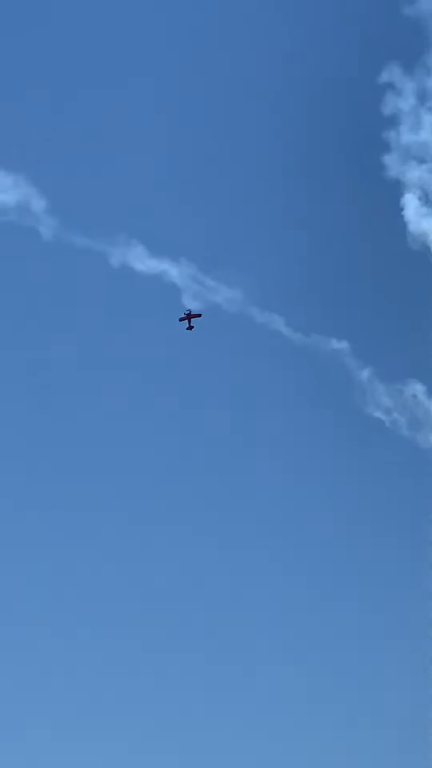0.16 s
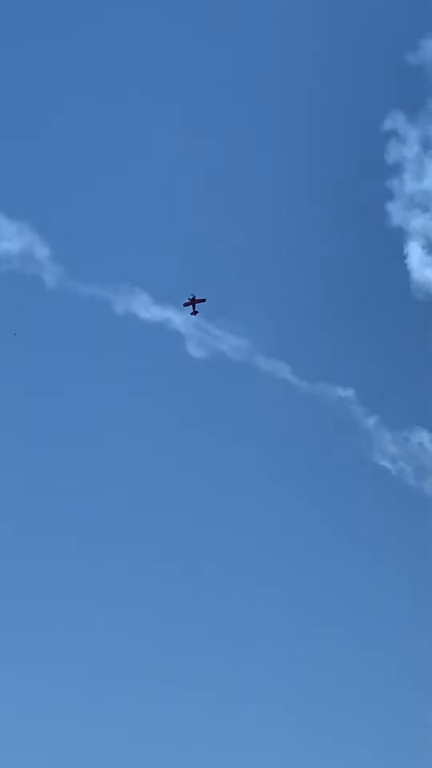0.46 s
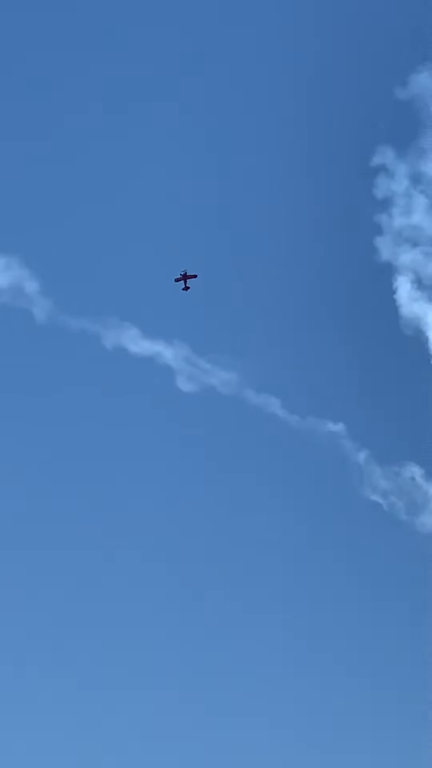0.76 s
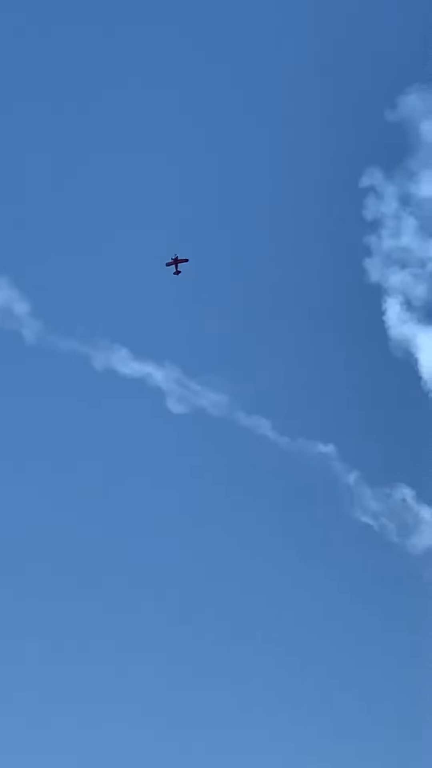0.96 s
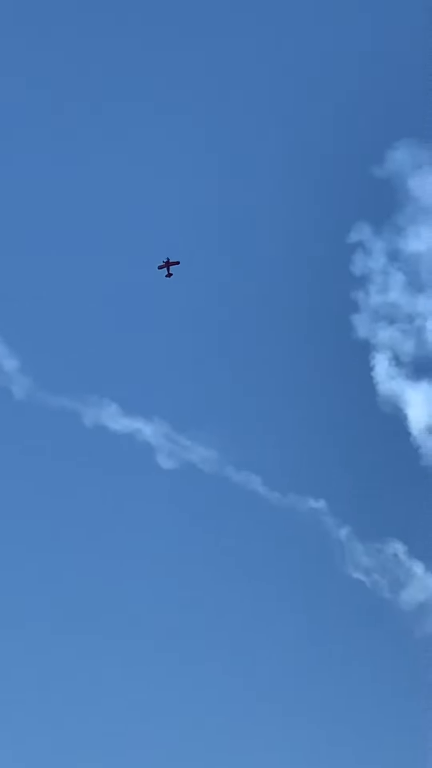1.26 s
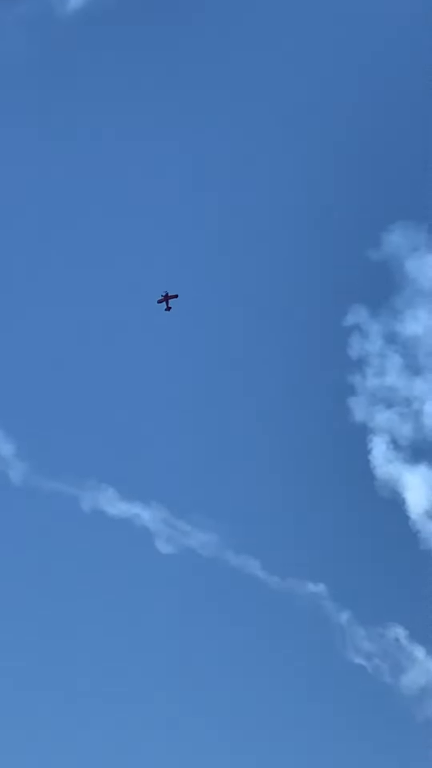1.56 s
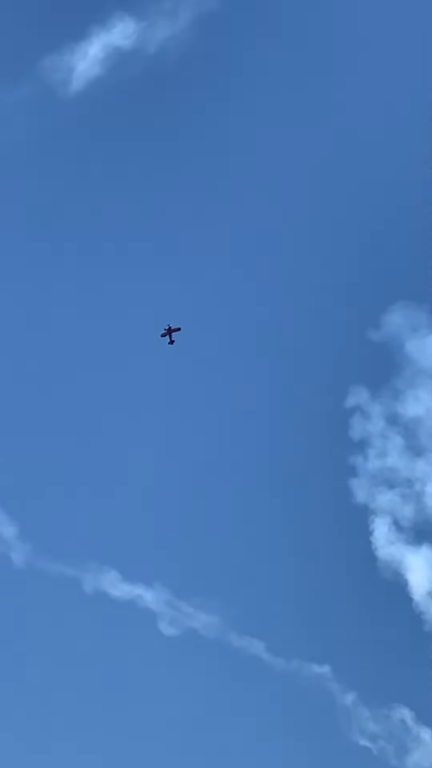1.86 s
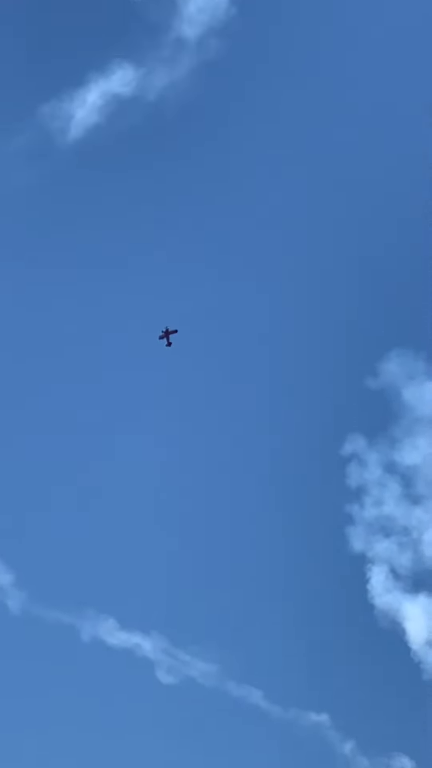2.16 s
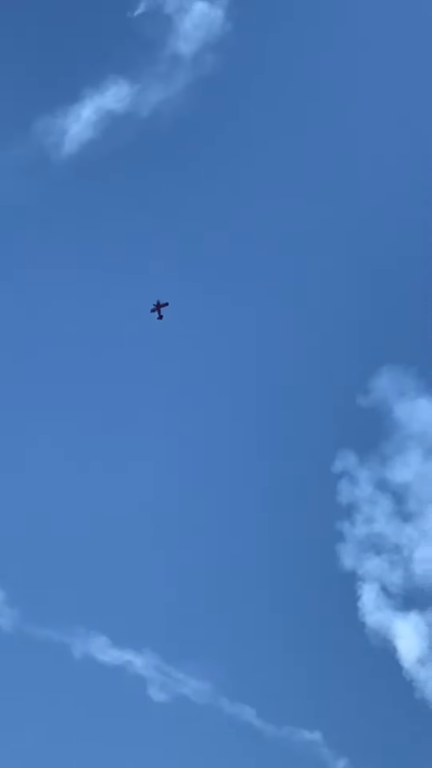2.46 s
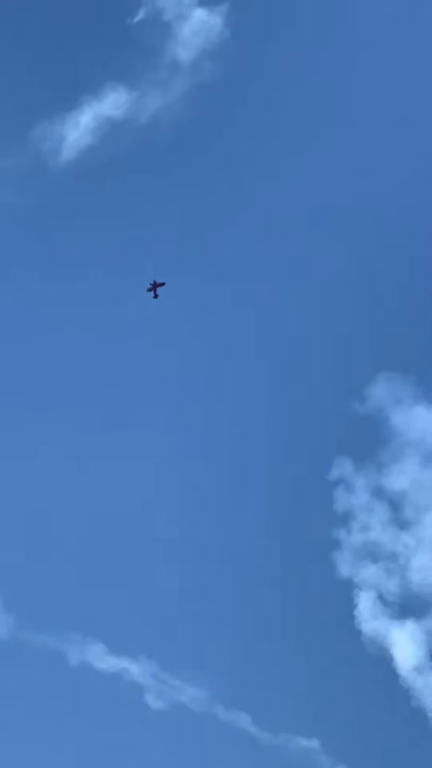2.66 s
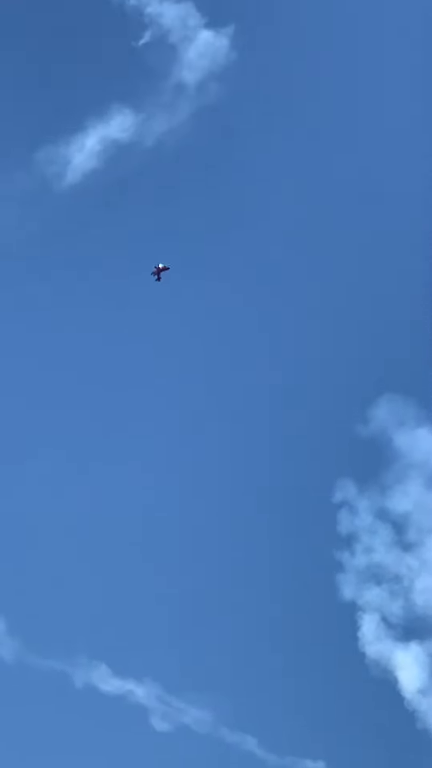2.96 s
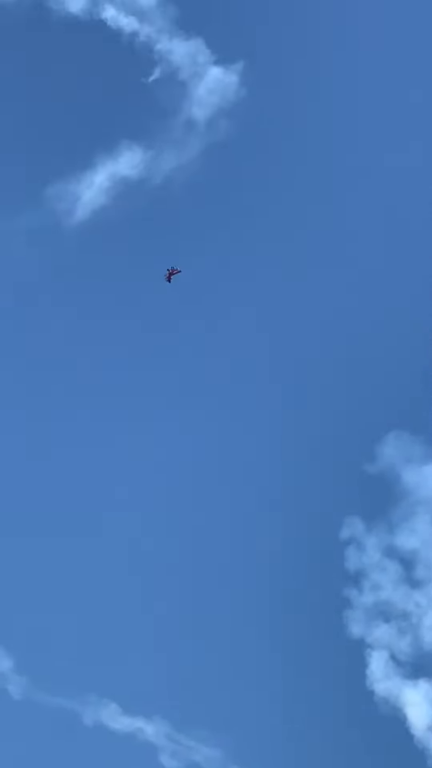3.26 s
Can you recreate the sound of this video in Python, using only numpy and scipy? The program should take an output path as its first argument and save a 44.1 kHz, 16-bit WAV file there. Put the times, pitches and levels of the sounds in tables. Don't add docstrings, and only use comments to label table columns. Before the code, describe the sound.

A small propeller plane's piston engine swells from a faint airy drone at 0 s to a hard, raspy blade buzz peaking around 1.0-1.4 s, its pitch sliding steadily down. From 1.5 s the treble dulls and flutters; around 2 s the tone roughens, then thins to a low, wavering hum by 3.4 s. Diffuse open-field rumble, faint hollow returns after 2.3 s, soft low wind thumps and very faint phone hiss.

```python
import sys
import numpy as np
from scipy import signal
from scipy.fft import rfft, irfft, next_fast_len
from scipy.io import wavfile
from scipy.ndimage import uniform_filter1d, minimum_filter1d, map_coordinates

SR = 44100
rng = np.random.default_rng(int(sys.argv[2]) if len(sys.argv) > 2 else 0)


def transcribe(u):
    v = np.clip(np.atleast_2d(u).T, -1, 1)
    q = np.round(v * 32767).astype(np.int16)
    wavfile.write(sys.argv[1], SR, q)


def magnitude_from_level(level_db):
    exponent = np.asarray(level_db, float) / 20
    return 10 ** exponent


N = 149940
TIME = np.arange(N) / SR


def unit(x):
    return x / np.sqrt(np.mean(x ** 2) + 1e-20)


def along(points, hz):
    f, v = np.transpose(points)
    return np.interp(np.log(hz + 1), np.log(f + 1), v)


def curves(rows):
    start_s, *columns = np.transpose(rows)
    return [np.interp(TIME, start_s, column) for column in columns]


def bumps(rows):
    return sum(height * np.exp(-((TIME - start_s) / width_s) ** 2) for start_s, height, width_s in rows)


def wobble(rate):
    return map_coordinates(rng.standard_normal(400), [TIME * rate])


def filtered(x, response):
    m = next_fast_len(N + SR // 4)
    m += m % 2
    return irfft(rfft(x, m) * response(np.fft.rfftfreq(m, 1 / SR)), m)[..., :N]


def causal(spectrum, ring=1):
    def response(hz):
        cepstrum = irfft(np.log(magnitude_from_level(along(spectrum, hz))))
        cepstrum[1:len(hz) - 1] *= 1 + ring
        cepstrum[len(hz):] *= 1 - ring
        return np.exp(rfft(cepstrum))
    return response


# pitch_hz, correlation [0 to 1]
PORT_LIKENESS = [(60, .92), (500, .8), (2000, .4), (5000, .2)]


def pair(spectrum):
    def shared_and_split(hz):
        turn = np.arccos(np.clip(along(PORT_LIKENESS, hz), -1, 1)) / 2
        return magnitude_from_level(along(spectrum, hz)) * np.array([np.cos(turn), np.sin(turn)])
    shared, split = filtered(rng.standard_normal((2, N)), shared_and_split)
    return unit(np.array([shared + split, shared - split]))


# start_s, pitch_hz
BLADE_RATE = [(0, 172.6), (.42, 164.5), (.63, 160.4), (1.05, 150.7), (1.47, 142.2), (1.68, 138.5),
              (1.89, 136.6), (2.1, 134), (2.31, 132), (2.94, 131.2), (3.4, 129)]
# start_s, snap_db, pop_db (over snap), rush_db (over snap), air_loss_db_per_khz
PASS_LEVELS = [(0.0, -54, -10, -1.5, 4), (.27, -33, -10.5, -5.5, 6), (.42, -28, -8.5, -5, 4),
               (0.5, -23.5, -13, -7.5, 3), (0.6, -28.5, -4, -4.5, 3), (0.76, -23.5, -2.5, -8.5, 2.5),
               (0.79, -27.5, -5.5, -6, 1.5), (1.0, -16.5, -7, -12.5, 2), (1.12, -17.5, -12, -11, 2),
               (1.22, -13, -14.5, -8.5, 2.5), (1.36, -17.5, -8.5, -15, 4.5), (1.43, -18, -9.5, -17, 9.5),
               (1.53, -34.5, -15, -22.5, 7.5), (1.6, -23, -16.5, -8, 8.5),
               (1.67, -35.5, -11.5, -16.5, 12.5), (1.83, -29, -14, -9.5, 12.5), (1.86, -42, -10.5, 1.5, 4),
               (2.03, -35.5, -7.5, 2, 7), (2.15, -36.5, -8, -6.5, 4), (2.24, -45, -7, -6.5, -0.5),
               (2.72, -43, -6.5, 0, -6), (2.84, -53, -4, -13, 5), (3.37, -47.5, -1.5, -12.5, -2),
               (3.4, -55, -8, -12, -3)]
# start_s, treble_gain_db_per_khz, width_s
CLEAR_AIR = [
    (0.464, 1, .05),
    (1.178, 2.5, 0.022),
    (1.4, 1.9, 0.016),
    (1, 0.66, .04),
    (1.3, 1, 0.033),
    (1.4, 1.5, .03),
    (2.71, 1.6, 0.03),
    (3.28, -0.1, .05),
    (1.8, 1, 0.032),
    (.88, .5, 0.032),
]


def plane():
    cycles = np.cumsum(curves(BLADE_RATE)[0]) / SR
    snap_db, pop_db, rush_db, loss = curves(PASS_LEVELS)
    flare = bumps(CLEAR_AIR)
    bright = tip_snaps(cycles) + magnitude_from_level(pop_db) * exhaust_pops(cycles) + magnitude_from_level(rush_db) * air_rush(cycles)
    bright = magnitude_from_level(snap_db + flare) * bright
    return engine_tones(cycles) + air(bright, np.maximum(loss, 0.87 * TIME) - flare, shimmer_db=2.6)


# start_s, pitch_hz (unused), thrum_db, drone_db, pipe_db, uneven_db
TONE_LEVELS = [(0.0, 172.9, -39.5, -41.5, -43.5, -53.5), (0.21, 169.7, -28, -39, -43.5, -45),
               (0.34, 166, -28, -29, -39, -46), (0.49, 162.9, -31.5, -22.5, -46, -46),
               (0.61, 161.5, -19.5, -27.5, -52, -49.5), (0.69, 161.3, -20.5, -43.5, -38, -48.5),
               (0.72, 158.3, -19, -30.5, -32.5, -57), (0.9, 154.2, -16.5, -31, -25, -45),
               (1.0, 151.9, -16.5, -35.5, -31, -44), (1.21, 147.4, -18, -18, -27, -31),
               (1.4, 143.6, -21.5, -21.5, -31, -39.5), (1.51, 143.2, -20, -19.5, -47, -40),
               (1.61, 139.6, -22.5, -20.5, -26, -36), (1.86, 138.7, -27, -23, -48, -39),
               (1.93, 136.9, -32, -39, -32, -42), (2.01, 135.5, -34.5, -33, -30, -39.5),
               (2.15, 134, -35.5, -30, -30, -38), (2.26, 133, -34.5, -36, -33.5, -44.5),
               (2.4, 133.1, -31, -27.5, -34.5, -40), (2.62, 132, -36.5, -30, -38, -37.5),
               (2.7, 132, -48, -28.5, -42.5, -41.5), (2.96, 132.5, -51, -27.5, -44, -44.5),
               (3.4, 130.6, -48, -32.5, -42.5, -43.5)]
# multiple of blade rate, level_db, drift_db_per_s as the tail turns to us
SHAFT_LINES = [(1 / 3, -17.5, .1), (2 / 3, -7, 0.53), (4 / 3, 2.7, -5.5), (5 / 3, -13, .1),
               (7 / 3, -4, 5.1), (8 / 3, -12.5, 5.2), (10 / 3, -1.7, -4.8), (11 / 3, -24.5, .1),
               (13 / 3, -9.5, 0.47), (16 / 3, -9, 2)]


def engine_tones(cycles):
    _, *levels, uneven_db = curves(TONE_LEVELS)
    rough = ragged(TIME) - 1.5 * (TIME > WAKE_S)
    tones = np.zeros(N)
    for k, db in enumerate(levels):
        level = np.sqrt(2) * magnitude_from_level(db + .45 * rough * wobble(35))
        drift = k * k * (TIME - 1.1) + .07 * k * rough * wobble(40)
        tones += level * np.cos(2 * np.pi * (k + 1) * cycles + drift)
    for order, db, drift_db in SHAFT_LINES:
        turning_db = drift_db * (np.minimum(TIME, 2.6) - 1.1)
        level = magnitude_from_level(uneven_db + db + turning_db + 2.8 * wobble(4.98))
        waver = .13 * order * (1 + .3 * rough) * wobble(14)
        tones += level * np.cos(2 * np.pi * order * cycles + waver)
    return tones


def pulses(cycles, pattern_db):
    jitter_cycles, scatter_db = .0015, .45
    k = np.arange(1, int(cycles[-1]))
    luck = rng.standard_normal((len(k), 2))
    at = np.interp(k + jitter_cycles * luck[:, 0], cycles, np.arange(N))
    taps = np.floor(at)[:, None] + np.arange(-7, 9)
    offset = taps - at[:, None]
    shape = np.sinc(offset) * np.cos(np.pi * offset / 18) ** 2
    size = magnitude_from_level(np.asarray(pattern_db)[k % len(pattern_db)] + scatter_db * luck[:, 1])
    where = np.clip(taps, 0, N - 1).astype(int)
    return np.bincount(where.ravel(), (shape * size[:, None]).ravel(), N)


# pitch_hz, level_db
SNAP_COLOUR = [(350, -43.5), (520, 6.5), (700, 7.5), (1100, -1), (2000, -4), (3500, -19.5), (6500, -30),
               (9000, -27)]


def tip_snaps(cycles):
    def before_and_after(hz):
        return np.array([causal(SNAP_COLOUR, ring)(hz) for ring in (.35, .75)])
    turned = np.interp(TIME, (1.08, 1.3), [0, 1])
    early, late = filtered(pulses(cycles, [0]), before_and_after)
    return unit((1 - turned) * early + turned * late)


# start_s, lag_cycles
POP_DELAY = [(0, 0.56), (.15, 0.6), (.42, 0.43), (.6, 0.5), (1.4, .98), (1.8, 0.72), (3.4, 1.55)]
CYLINDERS = [.1, -2, 1.1, -.8, 1.5, -1.7]
# pitch_hz, level_db
POP_COLOUR = [(350, -34), (520, 2), (700, -3.7), (1500, -4), (2200, -9), (3500, -18.5), (9000, -28.5)]


def exhaust_pops(cycles):
    firing = pulses(cycles - curves(POP_DELAY)[0], CYLINDERS)
    return unit(filtered(firing, causal(POP_COLOUR)))


# pitch_hz, level_db
RUSH_COLOUR = [(150, -16), (450, -4.5), (800, -1.5), (1800, 0.5), (3500, -9), (6500, -25), (9000, -40)]


def air_rush(cycles):
    return pair(RUSH_COLOUR) * (1 + .3 * np.cos(2 * np.pi * cycles - .6))


WAKE_S, WAKE_WIDE_S = 2.07, .2


def ragged(t):
    return 1 + 5 * np.exp(-((t - WAKE_S) / WAKE_WIDE_S) ** 2) + 2 * (t > WAKE_S)


def air(x, loss, shimmer_db):
    hz, t, z = signal.stft(x, SR, nperseg=512)
    patches = uniform_filter1d(rng.standard_normal((3, *z.shape[1:])), size=4, axis=1)
    slow = uniform_filter1d(patches[:2], size=13, axis=2)
    focus, skew = unit(uniform_filter1d(slow, size=7, axis=2))
    smear = .14 * ragged(t) * unit(uniform_filter1d(patches[2], size=6, axis=1))
    depth = np.clip(hz / 1500, .4, 1.5)[:, None]
    loss_db = np.outer(hz - 1000, np.interp(t, TIME, loss)) / 1000
    gain = magnitude_from_level(shimmer_db * depth * focus - loss_db)
    apart = .5 * .3 * np.array([skew, -skew])
    turn = np.exp(1j * depth * (smear + apart))
    return signal.istft(z * gain * turn, SR, nperseg=512)[1][:, :N]


# pitch_hz, level_db
FIELD_COLOUR = [(60, -8.5), (330, -2.5), (480, -12.5), (700, -3), (1050, -12), (1450, -7.5), (2800, -19.5),
                (6500, -54)]
# start_s, level_db
FIELD_SWELL = [(0, -7), (.4, 0.5), (1.3, 10), (2.4, 0.5), (3.4, 0)]
# start_s, level_db, width_s
WALL_RETURNS = [
    (2.361, 4.5, 0.048),
    (2.55, 1, 0.14),
    (2.7, 5, 0.057),
    (3.3, 2.5, .08),
]


def field():
    def narrow_dip(hz):
        return magnitude_from_level(-12 * np.exp(-((hz - 3290) / 130) ** 2))

    def wall_band(hz):
        return np.exp(-((hz - 1380) / 90) ** 2)
    far = air(filtered(pair(FIELD_COLOUR), narrow_dip), np.zeros(N), shimmer_db=2.8)
    hollow = unit(filtered(rng.standard_normal(N), wall_band))
    returns = bumps([(s, magnitude_from_level(db), width) for s, db, width in WALL_RETURNS])
    wall = magnitude_from_level(-47.5) * hollow * returns
    return magnitude_from_level(-38.5 + curves(FIELD_SWELL)[0] + 1.5 * wobble(9)) * far + wall


# pitch_hz, level_db
BUFFET_COLOUR = [(20, -37), (35, -20), (55, 19.5), (90, 24.5), (130, 16.5), (220, -55)]
# start_s, peak_db
WIND_THUMPS = [(0.049, -40), (0.149, -34.5), (0.599, -31), (0.689, -50), (1.199, -37), (1.669, -50.5),
               (1.779, -40), (1.919, -39.5), (2.119, -53.5), (2.849, -48), (3.328, -38)]


def wind():
    thump_hz, thump_s, thump_db = 86, .017, -2.5
    out, t = np.zeros(N + SR), np.arange(SR // 4) / SR
    u = t / thump_s
    swell = u / (u + .5) * u * np.exp(1 - u)
    for start_s, db in WIND_THUMPS:
        tone = np.sin(2 * np.pi * thump_hz * rng.uniform(.8, 1.0) * t)
        out[round(start_s * SR):][:len(t)] += magnitude_from_level(db + thump_db) * swell * tone
    return magnitude_from_level(-45 + 3 * wobble(7)) * pair(BUFFET_COLOUR) + out[:N]


# pitch_hz, level_db
WHINE_LINES = [
    (10874, -82),
    (11176, -83),
]
# pitch_hz, level_db
HISS_COLOUR = [(4500, -39.5), (6000, -6.5), (8300, -7), (9000, -28), (10200, -30.5), (10800, -1.5),
               (13300, -1.5), (14000, -28)]


def phone():
    tick_s, tick_hz = .252, 12500
    swell_db = -5.5 + 9 * np.exp(-((TIME - 1.1) / .8) ** 2)
    whine = np.zeros(N)
    for hz, db in WHINE_LINES:
        level = magnitude_from_level(db + 1.5 * wobble(3) + swell_db)
        whine += level * np.sin(2 * np.pi * hz * TIME + .5 * wobble(60))
    tick = magnitude_from_level(-60) * np.exp(-((TIME - tick_s) / .0004) ** 2) * np.cos(2 * np.pi * tick_hz * TIME)
    return magnitude_from_level(-91 + wobble(5)) * pair(HISS_COLOUR) + whine + tick


def scene():
    return plane() + field() + wind()


# pitch_hz, level_db
MIC_RESPONSE = [(2600, -0.52), (3250, -0.5), (4100, 2), (4900, -8.5), (6500, 1), (8200, -12), (9000, -38),
                (12500, -27)]
# pitch_hz, level_db
PORT_LEVEL = [(60, -.2), (180, -2.5), (300, -1.5), (600, -3.8), (1400, -2.2), (3000, -1.3)]
# pitch_hz, lead_rad
PORT_LEAD = [(60, -.2), (520, -1.1), (950, -1), (1250, -.1), (2000, .4), (3100, 1.3), (4500, 2),
             (12000, .6)]


def ports(dry):
    side = np.array([[.5], [-.5]])

    def response(hz):
        bass_cut = hz ** 3 / (hz ** 3 + 35 ** 3)
        gap_db = -13 * np.clip((hz - 8700) / 500, 0, 1)
        level = magnitude_from_level(along(MIC_RESPONSE, hz) + gap_db + side * along(PORT_LEVEL, hz))
        lead = along(PORT_LEAD, hz)
        makeup = np.maximum(np.abs(np.cos(lead / 2)), .6)
        return bass_cut * level * np.exp(1j * side * lead) / makeup
    return filtered(dry, response)


def limiter(x):
    need = np.minimum(1, .95 / (np.abs(x).max(0) + 1e-9))
    return x * uniform_filter1d(minimum_filter1d(need, size=1601), size=801)


def top_cut(x):
    return signal.sosfilt(signal.butter(12, 14000, fs=SR, output="sos"), x)


def record(dry):
    mix = limiter(ports(dry)) + phone()
    return top_cut(mix)


dry = scene()
out = record(dry)
transcribe(out)
```